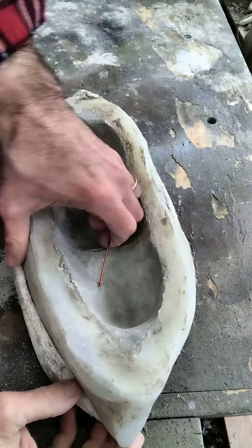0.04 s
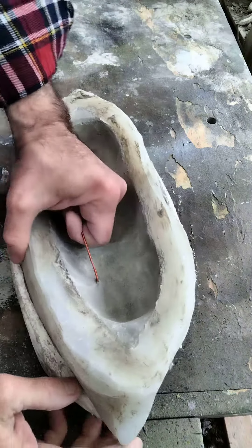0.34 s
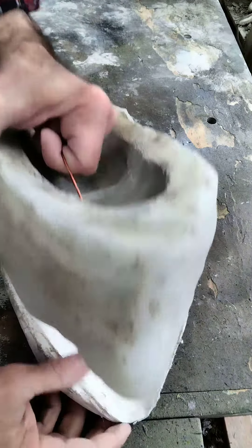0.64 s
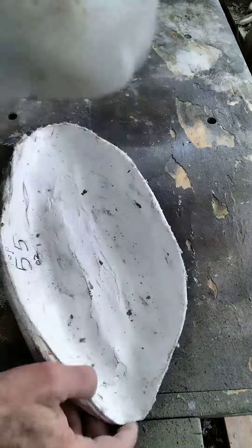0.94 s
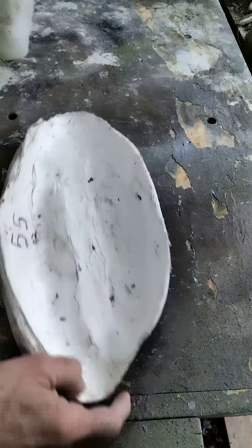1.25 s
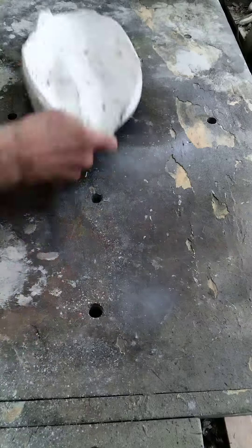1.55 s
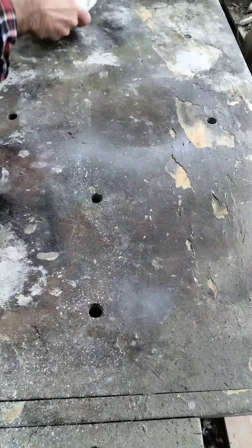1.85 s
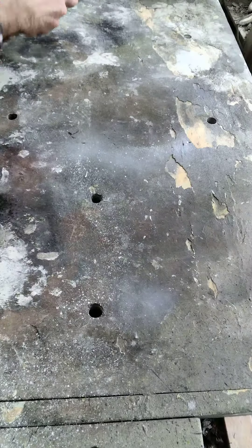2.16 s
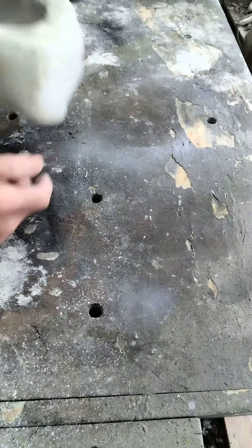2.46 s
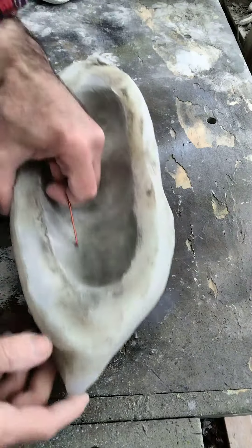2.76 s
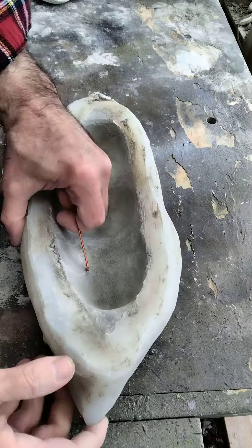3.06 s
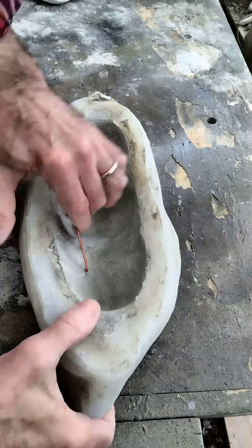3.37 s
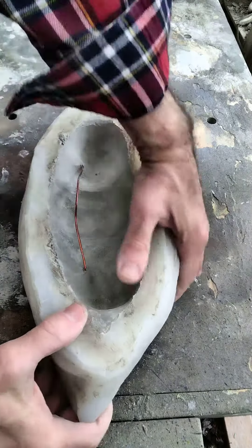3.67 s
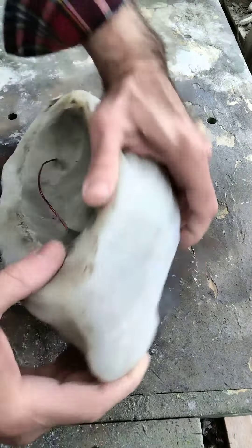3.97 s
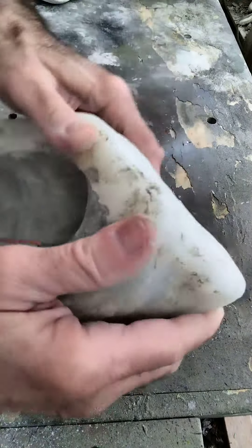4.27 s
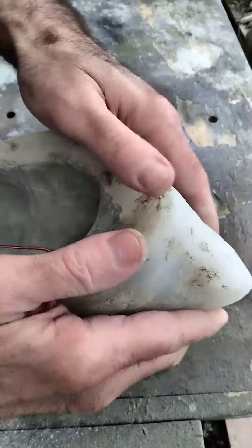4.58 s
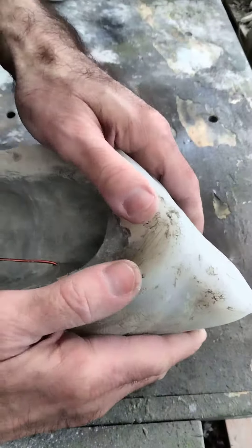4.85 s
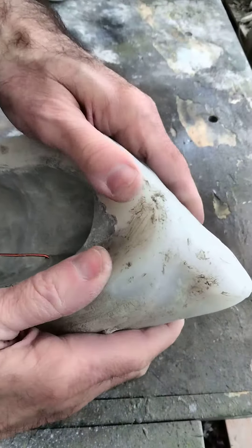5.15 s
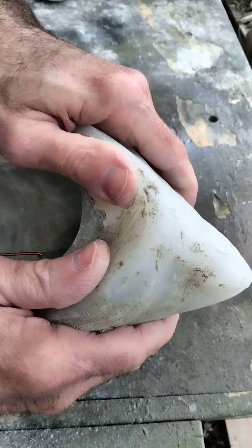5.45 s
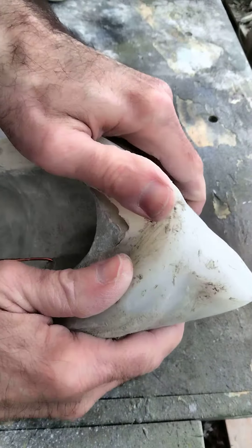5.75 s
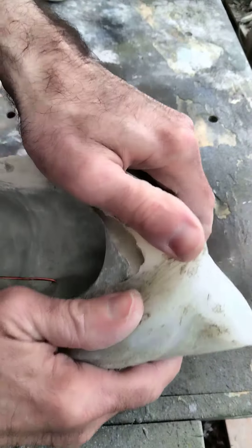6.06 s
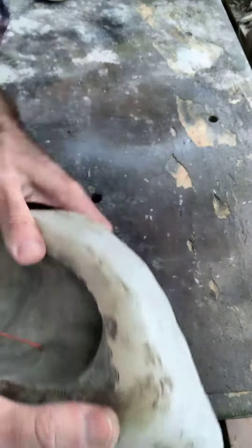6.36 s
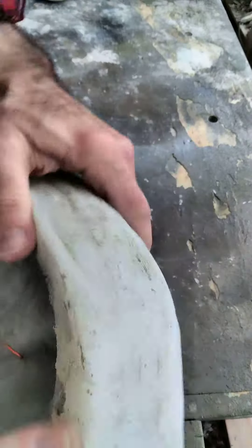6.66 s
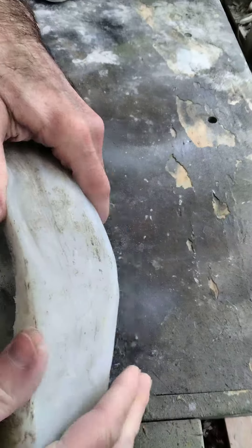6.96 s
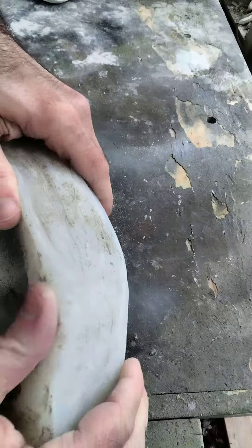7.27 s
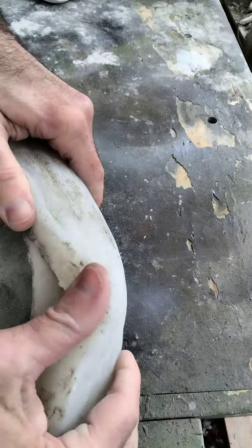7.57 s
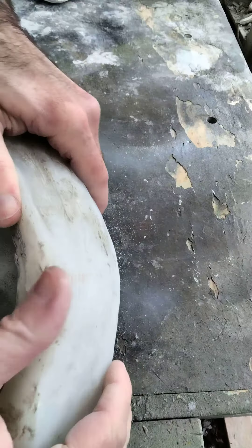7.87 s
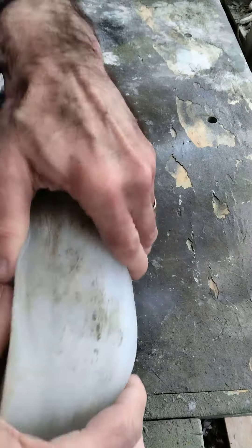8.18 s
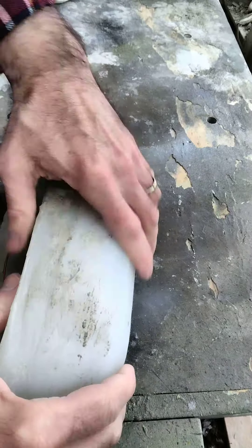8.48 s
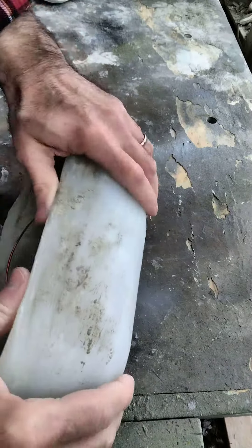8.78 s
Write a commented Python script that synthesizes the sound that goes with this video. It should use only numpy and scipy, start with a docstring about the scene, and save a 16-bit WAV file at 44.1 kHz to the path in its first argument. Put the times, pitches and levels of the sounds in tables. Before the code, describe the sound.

A hard shell knocks and drags grittily across an outdoor table, followed by faint skin swishes and tacky ticks on a rubber mould.

```python
"""A rubber mould rubs and groans out of its hard plaster shell on a worn outdoor table. The shell rocks,
knocks and is dragged over grit; impacts and stick-slip friction excite the modes of the table top, its
boards, and the shell's hollow and rim, while grains crack underneath. From about two seconds on, hands
slide over the mould and flex it, with tacky ticks and brief squeaks. Near the end it flops on the table
in a few soft thumps. A phone listens from close by, over faint outdoor air."""
import sys
import numpy as np
from scipy import signal
from scipy.fft import rfft, irfft
from scipy.io import wavfile
from scipy.ndimage import uniform_filter1d

SR = 44100
rng = np.random.default_rng(int(sys.argv[2]) if len(sys.argv) > 2 else 0)


def wav_out(sig):
    """Save sig, one row per channel (or a flat mono array), as 16-bit PCM at SR to the path in sys.argv[1]."""
    wavfile.write(sys.argv[1], SR, np.round(np.clip(np.atleast_2d(sig).T, -1, 1) * 32767).astype(np.int16))


N = 388962
T = np.arange(N) / SR
APART_HZ, LEFT_DB = 617, -0.35  # the microphone ports decorrelate above this; left treble against right

# The shell's drag. Each row: time in seconds, load on the table in dB, bite on the grit in dB.
DRAG = [(1.225, -58, -70), (1.257, -43.5, -58.5), (1.305, -45.5, -55), (1.315, -39, -46.5),
        (1.343, -38, -51), (1.361, -48, -60), (1.387, -38.5, -47), (1.461, -33.5, -42), (1.579, -40, -44),
        (1.611, -30.5, -40), (1.645, -40, -47.5), (1.677, -34.5, -49), (1.75, -39.5, -42),
        (1.769, -37.5, -40), (1.83, -39.5, -44), (1.87, -40.5, -45), (2.029, -40, -49.5),
        (2.045, -38, -47.5), (2.107, -51, -51), (2.129, -52, -57), (2.19, -66, -75)]
# Spectrum of breaking grit. Each row: frequency in Hz, relative level in dB.
GRIT_SPECTRUM = [(2500, -9.5), (3800, -13), (5400, -13.5), (7500, -15.5), (9500, -11.5), (11500, -9.5),
                 (13200, -5), (15000, -12), (16000, -11.5)]
# Spectrum of skin rasping on rubber. Each row: frequency in Hz, relative level in dB.
RASP_SPECTRUM = [(150, -14), (400, 10.5), (900, 1.5), (1600, 1), (3200, -2), (5500, -3.5), (9000, -9)]


def knocks(spots):
    """Impact excitation: the firmer the contact, the higher the modes that a blow reaches."""
    # Each row: time in seconds, level in dB, contact cut-off in Hz, table top and hollow shares in dB.
    blows = [(0.391, -36, 192, -5, 10), (0.457, -32, 500, -3.5, 7), (0.5435, -31.5, 1300, -13, -3),
             (0.551, -31.5, 378, 0, -3), (0.582, -18.5, 760, -5, 4), (0.586, -35, 417, -9, 14),
             (0.599, -29, 480, -20, -4), (0.754, -48, 2500, 2, -4), (1.011, -24.5, 420, 0, -3),
             (1.015, -39, 3000, -11, 10), (1.0445, -37.5, 2200, 2, 4.5), (1.051, -38.5, 328, 4.5, 0),
             (1.291, -42.5, 1800, -1, 13), (1.316, -33, 5000, -9, 5), (1.472, -37, 6000, -16, -8),
             (1.505, -46, 6000, 6, -8), (1.548, -24.5, 1300, -22, 13), (1.614, -24, 3500, -5, -5),
             (1.632, -36, 900, 11, 2), (1.643, -32.5, 1800, -7, 19), (1.667, -26, 900, -11, -1),
             (1.691, -18.5, 474, -7, 2), (1.73, -31, 8000, -7, 13), (1.757, -27, 2500, -11.5, -7),
             (1.8, -34, 2520, -15, 5), (1.826, -54, 1200, -8, 9), (2.044, -23, 1400, -11, -8),
             (2.115, -30.5, 800, -2.5, -11), (3.733, -54.5, 700, -15, 18), (3.867, -53.5, 700, -14.5, 14),
             (3.904, -51, 700, -8, 10), (3.959, -59, 1200, -8, 6), (7.66, -52, 1100, -9, 9),
             (7.831, -56.5, 1600, -8, 10), (8.482, -45, 800, -20, 10)]
    out = np.zeros((2, N))
    for k, (s, db, cutoff_hz, table_db, hollow_db) in enumerate(blows):
        parts = zip(shares(table_db, hollow_db), spots[k % len(spots)])
        blow = sum(share * response / np.abs(response).max() for share, response in parts)
        hz = np.fft.rfftfreq(blow.shape[1], 1 / SR)
        add(out, s, undb(db) * irfft(rfft(blow) * compliance(hz, cutoff_hz)))
    return out


def scrape(spots):
    """Stick-slip friction: each slip of the rim shakes the table and sets off a spray of grit."""
    # Rubber rubs out of the shell, then the shell settles. Each row: start and length in seconds,
    # level in dB, contact cut-off in Hz, table top and hollow shares in dB.
    rubs = [(0.372, 0.059, -52, 200, 2.5, 8), (0.443, 0.12, -46.5, 700, -2, 6),
            (0.704, 0.24, -60, 300, 4.5, -10), (0.743, 0.012, -58, 4000, 3, -10),
            (1.038, 0.039, -52, 1320, -2, -3), (1.108, 0.092, -65.5, 600, 4, 4)]
    # Where table top, boards, hollow and rim mainly ring, in Hz.
    part_hz = [170, 400, 950, 2000]
    slips = impulses(per_s=320, spread_db=-0.5)
    spray = 0.46 + unit(relax(slips, seconds=0.035))
    grit = unit(impulses(per_s=2300, spread_db=5.5) * rng.standard_normal(N) * spray)
    jolts = unit(slips - slips.mean())
    # heavy parts follow the slips, the light shell also the single grains
    forces = np.array([jolts, jolts, unit(1.07 * jolts + grit), unit(0.37 * jolts + grit)])
    drive = drag()
    for s, length, db, cutoff_hz, table_db, hollow_db in rubs:
        coupling = shares(table_db, hollow_db) * np.abs(compliance(part_hz, cutoff_hz))
        drive[:4] += undb(db) * np.outer(coupling, swell(s, length, attack_s=0.0093, release_s=0.014))
    crackle = unit(spray * fractures(per_s=4500, spread_db=3, spectrum=GRIT_SPECTRUM))
    ringing = moving_contact(forces * drive[:4], spots)
    catches = undb(5 + 2 * walk(70))  # the rim bites in uneven patches
    return ringing + plaster_ring(drive[4] * catches * crackle)


def drag():
    """Coupling varies with position: the drive of table top, boards, hollow, rim and grit on the way."""
    # One row for each of these: level in dB, change at one place in dB, time of passing it and
    # half width in seconds, drift in dB per second.
    passage = [(-4.5, -20, 1.766, 0.096, -5.5), (-5, 0.5, 1.9, 0.28, 6), (-16, 13.5, 1.768, 0.2, 2),
               (-0.5, 5.5, 1.41, 0.13, -2.5), (-6.5, 15, 2.406, 0.32, 0)]
    # The rim digs in and judders. Each row: start and length in seconds, level in dB.
    judders = [(1.422, 0.033, -49.5), (1.481, .035, -51), (1.587, 0.035, -45), (1.725, 0.0067, -33.5),
               (1.754, 0.035, -47), (1.874, 0.026, -51), (2.03, 0.017, -53)]
    load, bite = gain_curves(DRAG)
    drive = np.array([load, load, load, bite, bite])
    for part, (db, change_db, s, width, drift) in enumerate(passage):
        drive[part] *= undb(db + change_db * np.exp(-((T - s) / width) ** 2) + drift * (T - s))
    for s, length, db in judders:
        drive[3] += undb(db) * swell(s, length, attack_s=0.002, release_s=0.0027)
    return drive


def moving_contact(forces, spots, size=8192):
    """A moving force weights the modes anew in each overlapping stretch, and the rim's rasp darkens."""
    # Broad peak of the rim's rasp. Each row: time in seconds, centre in Hz.
    rasp_centre = [(1.3, 1890), (1.47, 2100), (1.62, 1750), (1.76, 1400), (1.86, 1350), (2.1, 1640)]
    out = np.zeros((2, N))
    window = np.sin(np.pi * np.arange(size) / size) ** 1.5
    for k, i in enumerate(range(0, int(DRAG[-1][0] * SR), size // 2)):
        *others, rim = forces[:, i:i + size] * window
        hz = np.interp(T[i + size // 2], *np.transpose(rasp_centre))
        rim = colour(rim, [(hz / 2, -3), (hz, 1), (2 * hz, -3)])
        for force, response in zip((*others, rim), spots[k % len(spots)]):
            add(out, i / SR, signal.fftconvolve(force[None], response, axes=1))
    return out


def contact_spot():
    """Linear response: how table top, boards, hollow and rim answer an impulse at one spot."""
    # Clear modes. Each row: frequency in Hz, relative height in dB, 60 dB decay time in seconds.
    top_modes = [(144.3, -2.5, 0.18), (181.5, -6.5, 0.1), (194.2, -6, 0.26)]
    board_modes = [(270.7, -1, 0.36), (295.3, 6, 0.11), (359, 3.5, 0.079), (413, -5, 0.061),
                   (474, -14, 0.14), (504, -12.5, 0.23), (652, 0, 0.14)]
    hollow_modes = [(907, 0.5, 0.1), (944, 8, 0.11), (985, 8.5, 0.13), (1160, 2.5, 0.069), (1337, 1, 0.1),
                    (1437, -1, 0.083)]
    rim_modes = [(1540, -6, 0.067), (1690, 10, 0.04), (1800, 5.5, 0.075), (1940, 1, 0.031),
                 (2034, -3, 0.084), (2134, -8, 0.084), (2393, 4.5, 0.05), (2490, 4, 0.068),
                 (2605, -3, 0.046), (2714, 1, 0.04), (3240, -6.5, 0.028), (3400, -2, 0.04),
                 (3810, 0, 0.067), (4500, 2, 0.077)]
    # Spectra of the many weak modes between them. Each row: frequency in Hz, relative level in dB.
    top_wash = [(60, -47), (100, -22), (135, -1.5), (220, -2), (300, -14), (600, -41)]
    board_wash = [(150, -41), (250, -11), (340, 1), (450, -2), (680, -4.5), (850, -13), (1500, -47)]
    hollow_wash = [(400, -41), (740, 4), (950, 24), (1400, -10), (1900, -15), (4000, -82)]
    rim_wash = [(900, -21), (1500, 8.5), (1950, -2), (2500, 10), (3100, 6), (4600, -8), (6500, -2.5),
                (12000, -31)]
    # the shell detunes as it is held and pressed differently
    return (resonator(top_modes, top_wash, wash_db=-3.5, wash_t60=0.027, left_db=-2.0),
            resonator(board_modes, board_wash, wash_db=-0.5, wash_t60=0.15, left_db=0.7),
            resonator(hollow_modes, hollow_wash, wash_db=-0.5, wash_t60=0.011, left_db=-3.2, detune=0.005),
            resonator(rim_modes, rim_wash, wash_db=-5, wash_t60=0.035, left_db=-2.6, detune=0.01))


def resonator(modes, spectrum, wash_db, wash_t60, left_db, detune=0, spread_db=3.5, size=8192):
    """Modal superposition: damped sines of chance strength ring over a wash of weak modes."""
    t = T[:size]
    hz, db, t60 = np.transpose(modes)[:, :, None]
    heights = undb(db + spread_db * rng.standard_normal(db.shape)) / t60
    hz = hz * (1 + detune * rng.standard_normal(hz.shape))
    # higher modes reach the two ports out of step
    lag = np.minimum((hz / APART_HZ) ** 4, 1) * np.pi / 4 * (-1) ** np.arange(len(hz))[:, None]
    phase = 2 * np.pi * hz * t
    ring = np.array([heights[:, 0] @ (decay(t, t60) * np.sin(phase + side * lag)) for side in (1, -1)])
    wash = noise(spectrum, size) * decay(t, wash_t60)
    # each part radiates only around its own modes
    band = signal.butter(3, [0.75 * modes[0][0], 1.4 * modes[-1][0]], "band", fs=SR, output="sos")
    left, right = signal.sosfilt(band, unit(ring) + undb(wash_db) * unit(wash))
    return np.array([unit(left) * undb(left_db / 2), unit(right) * undb(-left_db / 2)]) / np.sqrt(size)


def shares(table_db, hollow_db):
    """Mechanical coupling: a contact drives each of the four parts with its own gain."""
    # How readily table top, boards, hollow and rim answer, in dB.
    part_db = [-3.5, -2.6, -9.5, -1.5]
    return undb(np.add(part_db, [table_db, 0, hollow_db, 0]))


def compliance(hz, cutoff_hz):
    """A compliant contact acts as a second-order low-pass filter on the force."""
    return 1 / (1 + 1j * np.asarray(hz) / cutoff_hz) ** 2


def crunches(cracks_per_s=840, size=4096):
    """Brittle fracture: a grain breaks in a run of small cracks; the finer the grain, the brighter."""
    # Each row: time in seconds, relative level in dB, decay time in seconds, tilt in dB per octave.
    crushed_grains = [(1.317, -31, 0.0044, -0.5), (1.328, -33.5, 0.0088, 0), (1.377, -43, 0.005, -3),
                      (1.435, -25, 0.0062, -2), (1.478, -32, 0.0044, 1), (1.519, -34, .004, 0),
                      (1.559, -22, 0.006, 9), (1.59, -23.5, 0.005, -1.5), (1.602, -27, 0.0063, 3),
                      (1.6126, -24.5, 0.0061, -3.5), (1.626, -27, 0.012, 3), (1.643, -26.5, 0.0043, -6),
                      (1.726, -28.5, 0.007, -7), (1.758, -22, 0.0023, -3), (1.805, -32, 0.0044, 9),
                      (1.926, -33, 0.0061, 1), (1.953, -35.5, 0.016, -6), (1.98, -37, 0.011, 11),
                      (2.046, -37, 0.014, -10), (2.076, -35, .005, -2), (2.095, -31, 0.0075, 2)]
    out, t = np.zeros((2, N)), T[:size]
    for s, db, decay_s, tilt in crushed_grains:
        spectrum = [(hz, level + tilt * np.log2(hz / GRIT_SPECTRUM[0][0])) for hz, level in GRIT_SPECTRUM]
        cracks = (rng.random(size) < cracks_per_s / SR) | (t == 0)
        bursts = unit(1 + 0.87 * relax(cracks, seconds=0.00026))
        add(out, s, undb(db - 5.5) * bursts * noise(spectrum, size) * np.exp(-t / decay_s))
    return plaster_ring(out)


def fractures(per_s, spread_db, spectrum, size=64):
    """Acoustic emission: tiny releases of uneven size each ring a few cycles at their own pitch."""
    when, pitch, chance, turn = rng.random((int(per_s * N / SR), 4)).T[:, :, None]
    strength = undb(-spread_db * np.log(np.maximum(chance, 0.01)))
    phase = np.pi * (0.1 + 0.62 * pitch) * np.arange(size)
    place = ((when * (N - size)).astype(int) + np.arange(size)).ravel()
    fade = strength * np.exp(-T[:size] / 0.00013)
    pair = [np.bincount(place, (fade * np.sin(phase + lag)).ravel(), N) for lag in (0, 2 * np.pi * turn)]
    return unit(colour(np.array(pair), spectrum) * undb([[LEFT_DB / 2], [-LEFT_DB / 2]]))


def plaster_ring(grit, ring_db=1.5, size=2048):
    """Modal overlap: the shell's crowded high modes answer the grit like a short burst of noise."""
    response = rng.standard_normal((2, size)) * decay(T[:size], t60=0.014)
    response /= np.linalg.norm(response, axis=1, keepdims=True)
    return blend(grit, signal.fftconvolve(grit, response, axes=1)[:, :N], ring_db)


def hands(grip_from_s=3.23):
    """Sliding friction: dry skin hisses on the rubber in proportion to its speed and rasps if pressed."""
    # Each row: middle and length in seconds, relative hiss level in dB, rasp against hiss in dB.
    strokes = [(0.11, 0.28, -69.5, -11), (0.486, 0.19, -68.5, -3.5), (0.545, 0.076, -59.5, -3.5),
               (0.63, 0.15, -69, -1.5), (1.03, 0.2, -62.5, -1), (1.177, 0.44, -70.5, 1.5),
               (2.29, 0.32, -66.5, -1), (2.41, 0.39, -64, -4.5), (2.7, 0.38, -79, 6.5),
               (2.99, 0.077, -81, -6), (3.31, 0.3, -71, -0.5), (3.363, 0.084, -65.5, -6.5),
               (3.452, 0.066, -66, -14), (3.71, 0.35, -69.5, -5), (3.878, .14, -66, -8),
               (3.963, 0.073, -67, 5.5), (4.053, 0.42, -63, -8), (4.298, 0.082, -52.5, -7.5),
               (4.324, 0.12, -57.5, -4), (4.395, 0.1, -59.5, -7), (4.545, 0.25, -57.5, -11.5),
               (4.735, 0.096, -68.5, -1.5), (4.842, 0.18, -63.5, -8.5), (5.018, 0.24, -67.5, -6.5),
               (5.144, 0.095, -66, -6.5), (5.248, 0.15, -65, -12), (5.603, 0.26, -63.5, -15.5),
               (5.612, 0.029, -66, -13), (5.689, 0.037, -64, -9), (5.798, 0.5, -69.5, -29),
               (5.986, 0.11, -60, -10), (6.144, 0.99, -72, -8), (6.33, 0.15, -55.5, -15.5),
               (6.408, 0.13, -59, -5.5), (6.57, 0.32, -66, -3), (6.648, 0.23, -51, -9.5),
               (6.827, 0.23, -52, -6), (7.126, 0.23, -65, -9.5), (7.213, 0.048, -60.5, -14),
               (7.45, 0.42, -67.5, -7.5), (7.637, 0.22, -65, -7), (7.667, 0.047, -69, 1.5),
               (7.812, .065, -62, -11), (7.87, 0.5, -73.5, -11), (8.022, 0.16, -60, -13.5),
               (8.18, 0.22, -62.5, -15.5), (8.337, 0.02, -61.5, -3.5), (8.444, 0.069, -58.5, -13),
               (8.563, 0.28, -60, -19), (8.806, 0.13, -57.5, -17)]
    # Each row: frequency in Hz, relative level in dB.
    hiss_spectrum = [(1760, -28), (3200, -12.5), (4320, -8), (6480, -5.5), (13300, 10.5), (15000, 9.5),
                     (16000, -36)]
    grip = undb(-80 + 3.5 * walk(12)) * np.clip((T - grip_from_s) / 0.18, 0, 1)  # fingers holding on
    hiss_power, rasp_power = grip ** 2, (undb(-11.5) * grip) ** 2
    for s, length, db, rasp_db in strokes:
        speed = np.cos(np.pi * (T - s) / length) * (np.abs(T - s) < length / 2)
        power = (undb(db) * speed) ** 2
        hiss_power += power
        rasp_power += undb(rasp_db) ** 2 * power
    texture = undb(walk(70) + 0.64 * walk(450))
    specks = undb(-15.5) * fractures(per_s=520, spread_db=3, spectrum=hiss_spectrum)
    snags = undb(-12) * fractures(per_s=45, spread_db=2.5, spectrum=hiss_spectrum)  # skin ridges catch
    hiss = undb(2) * np.sqrt(hiss_power) * (noise(hiss_spectrum) + specks + snags)
    rasp = undb(3) * np.sqrt(rasp_power) * noise(RASP_SPECTRUM)
    return table_reflection(texture * (hiss + rasp))


def table_reflection(direct, delay_s=0.001095, wander=0.0996):
    """Comb filtering: a sound interferes with its bounce, whose delay shifts as the hands move."""
    bounce = [np.interp(T - delay_s * (1 + wander * walk(3)), T, side) for side in direct]
    return blend(direct, np.array(bounce), db=-5.5)


def flexing():
    """Deformation: rubber bending in the hands gives a dull, low noise."""
    # Each row: time in seconds, relative level in dB.
    flex_levels = [(2.2, -73), (2.4, -86), (3.05, -63), (3.2, -70), (4.14, -69.5), (5.02, -63), (5.22, -72),
                   (6.37, -61), (6.4, -72.5), (7.07, -61.5), (7.32, -67.5), (7.66, -55.5), (8.23, -66),
                   (8.34, -56), (8.8, -64), (8.82, -76)]
    # Each row: frequency in Hz, relative level in dB.
    flex_spectrum = [(60, 1.5), (140, 1.5), (183, 9), (235, 0), (285, 0.5), (450, -7.5), (650, -21),
                     (1000, -58)]
    return undb(-0.5) * gain_curves(flex_levels)[0] * noise(flex_spectrum)


def squeaks():
    """Stick-slip oscillation: rubber against shell or skin sounds a ragged, gliding tone."""
    # Each row: start and length in seconds, first and last pitch in Hz, relative level in dB.
    glides = [(0.465, 0.051, 647, 666, -47.5), (0.506, 0.027, 704, 676, -51), (0.531, 0.032, 683, 647, -43),
              (0.574, 0.033, 672, 627, -39), (6.58, 0.13, 1350, 1866, -62), (6.598, 0.058, 2350, 3150, -61),
              (6.621, 0.059, 2910, 3450, -56.5), (6.662, 0.06, 2300, 2810, -62.5),
              (7.643, 0.036, 610, 690, -58.5)]
    out = np.zeros((2, N))
    for s, length, start_hz, end_hz, db in glides:
        size = int(length * SR)
        hz = np.linspace(start_hz, end_hz, size) * (1 + 0.038 * walk(900)[:size])
        phase = 2 * np.pi * np.cumsum(hz) / SR
        add(out, s, undb(db + 3.5) * np.hanning(size) * quadrature(phase))
    return out


def ticks(size=2048):
    """Adhesion: tacky skin lets go of the rubber with a tiny snap, a brief fizz and a thin ring."""
    # Each row: time in seconds, snap peak in dB, mid-range share in dB, ring pitch in Hz.
    releases = [(2.966, -45, -30, 13100), (3.61, -45, -22, 13000), (5.3954, -36.5, -44, 12700),
                (5.447, -31.5, -50, 11940), (5.476, -49, -30, 12500), (5.523, -46, -26, 13000),
                (5.53, -38, -17, 10900), (5.568, -40, -6, 12300), (5.604, -32, -13, 13700),
                (5.981, -44, 6, 12100), (5.9995, -36.5, 1, 13100), (6.099, -49, -20, 12500),
                (6.191, -46, -20, 13000), (7.43, -42, 4, 12500), (7.554, -40, -27, 13600),
                (7.569, -35.5, -22, 13800), (7.572, -36, -10, 10600), (7.644, -36, -3, 13600),
                (7.672, -33, 1, 5600), (7.7395, -44, 9, 11500), (7.7997, -26, -25, 10000),
                (7.827, -34, -18, 13000), (7.8302, -34.5, -1, 13800), (8.332, -42.5, -8, 12000)]
    # Each row: frequency in Hz, relative level in dB.
    snap_spectrum = [(2000, -75), (5000, -7), (7500, -6.5), (10000, -1.5), (13000, 13), (16000, -6.5)]
    out, t = np.zeros((2, N)), T[:size]
    for s, db, mid_db, hz in releases:
        fizz = (np.exp(-t / 0.0008) + undb(-15) * np.exp(-t / 0.005)) * rng.standard_normal((2, size))
        force = np.roll((t == 0) + 0.7 * fizz, size // 2, axis=1)  # centred so the filter can spread it
        snap = colour(force, snap_spectrum) + undb(mid_db) * colour(force, RASP_SPECTRUM)
        ring = quadrature(2 * np.pi * hz * t) * decay(t, t60=0.013)
        add(out, s - t[size // 2], undb(db) * snap / np.abs(snap).max())
        add(out, s, undb(db - 11) * ring)
    return out


def thumps(size=4096):
    """Heavy damping: the soft mould lands on the table with a single swing."""
    # Each row: time in seconds, relative level in dB, pitch in Hz.
    landings = [(8.331, -43.5, 92), (8.356, -51, 114), (8.447, -41, 77.5), (8.491, -48.5, 145)]
    out, t = np.zeros((2, N)), T[:size]
    for s, db, hz in landings:
        swing = np.sin(2 * np.pi * hz * t) * (1 - np.exp(-t / 0.00089)) * np.exp(-t / 0.0061)
        add(out, s, undb(db + 7.5) * swing[None])
    return out


def air():
    """The noise floor: outdoor rumble and the microphone's own hiss, wavering slightly."""
    # Each row: frequency in Hz, relative spectral density in dB.
    air_spectrum = [(12, 0.5), (20, -0.5), (74, 3.5), (198, -6), (574, -14), (949, -17.5), (1290, -24.5),
                    (3250, -31.5), (3630, -35), (5530, -32.5), (6360, -36.5), (10200, -31), (13200, -20.5),
                    (14700, -39), (16000, -30)]
    return undb(-62 + 0.5 * walk(2.72)) * noise(air_spectrum)


def noise(spectrum, size=N):
    """Spatial coherence: noise of rms 1, alike at both ports in the bass, unrelated in the treble."""
    hz = np.fft.rfftfreq(size, 1 / SR)
    apart = hz ** 6 / (hz ** 6 + APART_HZ ** 6)
    mid, side = rfft(rng.standard_normal((2, size)))
    side *= np.sqrt(0.036 + apart)
    tilt = undb(LEFT_DB * apart / 2)
    pair = irfft(np.array([(mid + side) * tilt, (mid - side) / tilt]), size)
    return unit(colour(pair, spectrum))


def colour(x, spectrum):
    """Filter by a spectrum of (Hz, dB) points."""
    hz, db = np.transpose(spectrum)
    f = np.maximum(np.fft.rfftfreq(x.shape[-1], 1 / SR), 1)
    return irfft(rfft(x) * undb(np.interp(np.log(f), np.log(hz), db)), x.shape[-1])


def walk(per_s):
    """Slow fluctuation: random levels, held and then smoothed twice."""
    hold = int(SR / per_s)
    steps = np.repeat(rng.standard_normal(N // hold + 1), hold)
    return 2.18 * uniform_filter1d(uniform_filter1d(steps, hold), hold)[:N]


def impulses(per_s, spread_db):
    """A Poisson process of uneven clicks, rms 1."""
    return unit((rng.random(N) < per_s / SR) * undb(spread_db * np.clip(rng.standard_normal(N), -2, 2)))


def gain_curves(table):
    """One gain curve for each dB column of a table, silent outside its times."""
    s, *columns = np.transpose(table)
    return np.array([undb(np.interp(T, s, db)) for db in columns]) * (T >= s[0]) * (T <= s[-1])


def swell(start, length, attack_s, release_s):
    """Linear rise, hold and exponential release."""
    return np.clip((T - start) / attack_s, 0, 1) * np.exp(-np.clip((T - start - length) / release_s, 0, 20))


def relax(x, seconds):
    """Leaky integration gives each impulse an exponential tail."""
    return signal.lfilter([1], [1, -np.exp(-1 / (seconds * SR))], x)


def decay(t, t60):
    """Exponential damping, 60 dB in t60 seconds."""
    return np.exp(-np.log(1000) * t / t60)


def quadrature(phase):
    """A tone a quarter cycle apart at the two ports."""
    return np.array([np.sin(phase), np.cos(phase)])


def blend(x, other, db):
    """Power-normalised mix of two signals, the second weighted by db."""
    return (x + undb(db) * other) / np.hypot(1, undb(db))


def add(out, s, sound):
    """Mix a short sound in at s seconds."""
    i = int(s * SR)
    out[:, i:i + sound.shape[1]] += sound[:, :N - i]


def undb(db):
    """Decibels to gain."""
    return 10 ** (np.asarray(db) / 20)


def unit(x):
    """Scale to rms 1."""
    return x / np.sqrt(np.mean(x ** 2))


def scene():
    """Superposition: shell, table and mould sound together over the outdoor air."""
    spots = [contact_spot() for _ in range(7)]
    background = air()
    shell = scrape(spots) + knocks(spots) + crunches()
    mould = hands() + flexing() + squeaks() + ticks() + thumps()
    return shell + mould + background


def record(dry, cutoff_hz=15500):
    """Band limiting: the phone's steep low-pass filter cuts the very top."""
    return signal.sosfilt(signal.ellip(10, 0.2, 70, cutoff_hz, fs=SR, output="sos"), dry)


dry = scene()
out = record(dry)
wav_out(out)
```